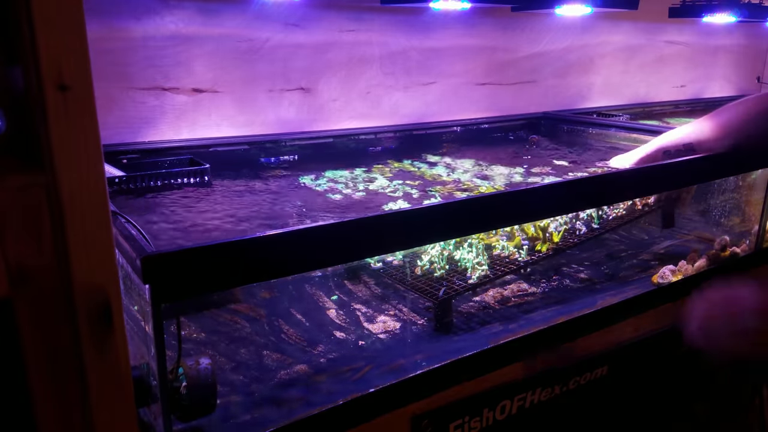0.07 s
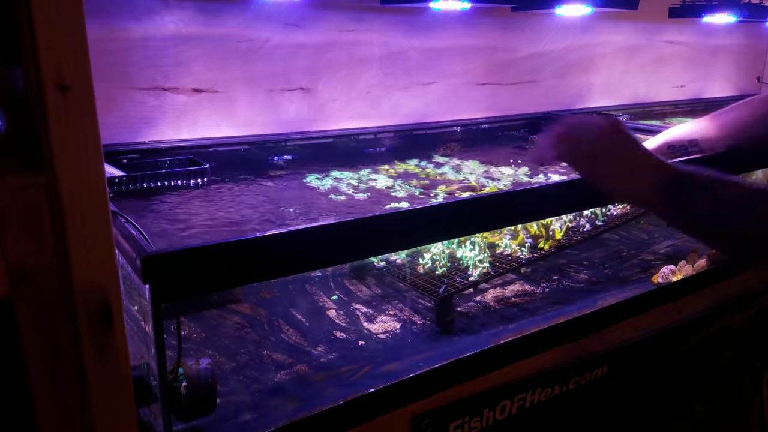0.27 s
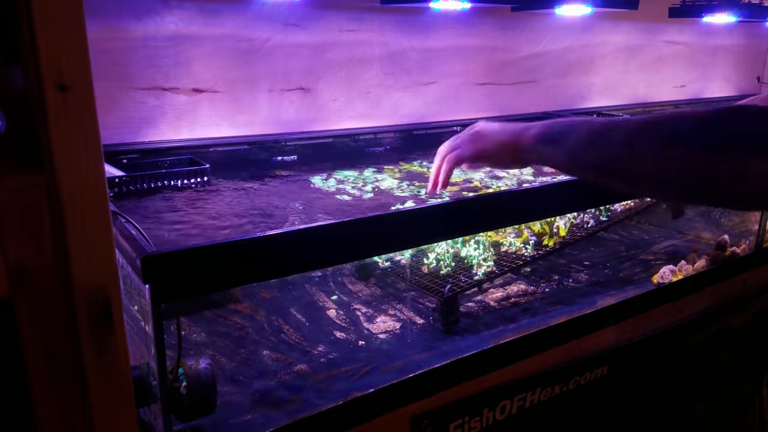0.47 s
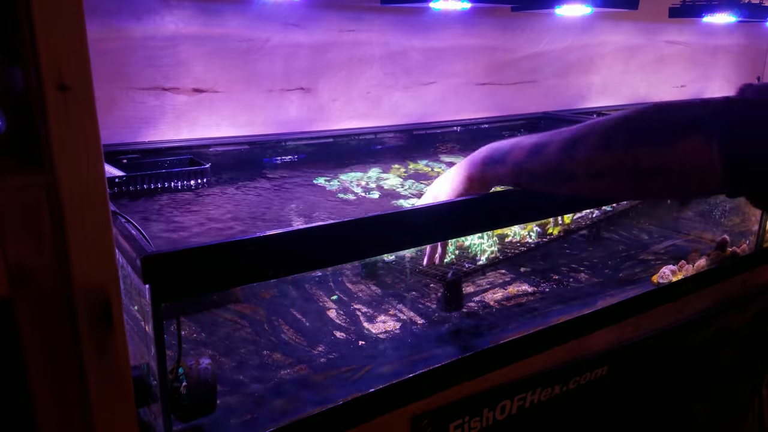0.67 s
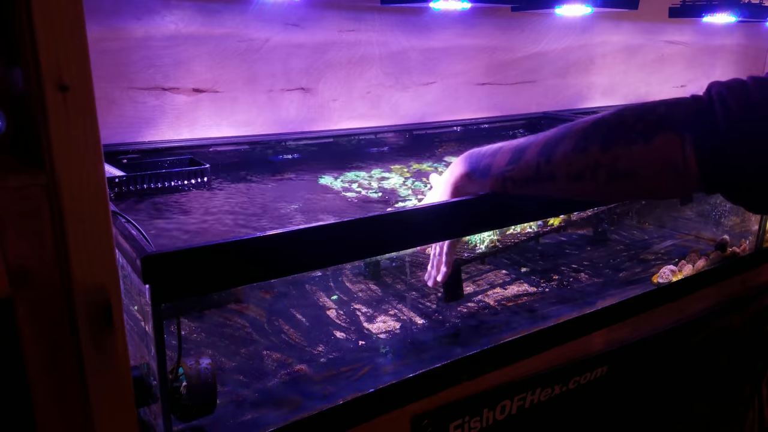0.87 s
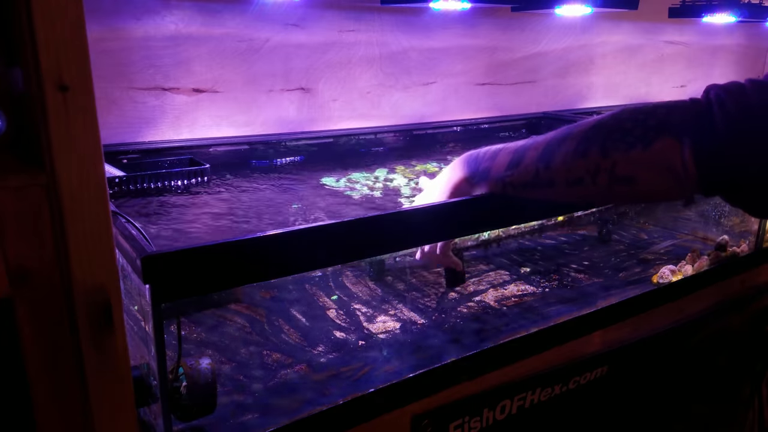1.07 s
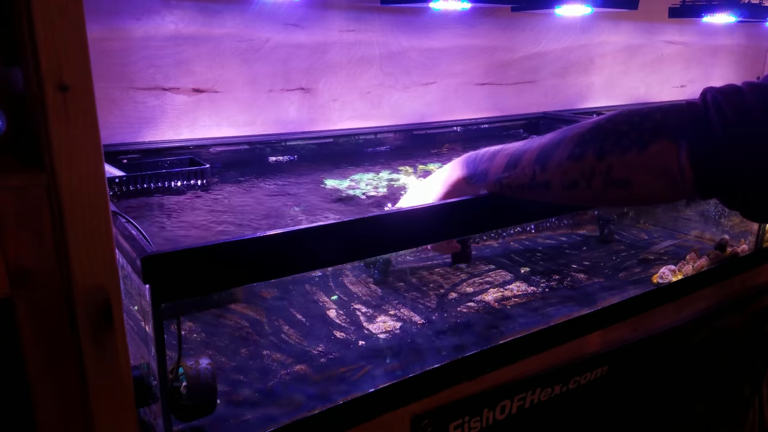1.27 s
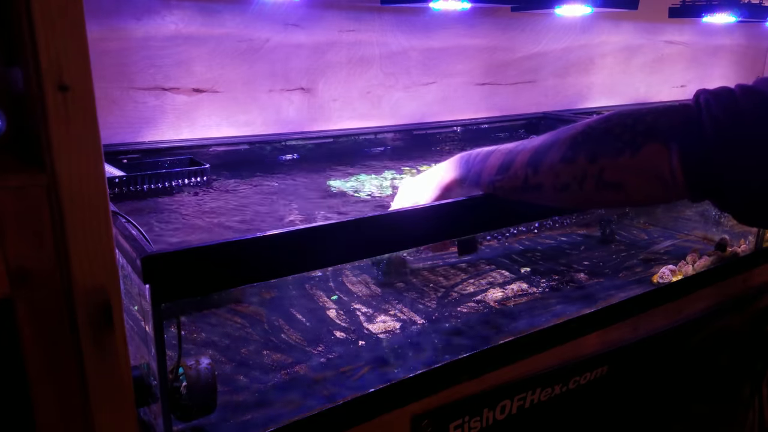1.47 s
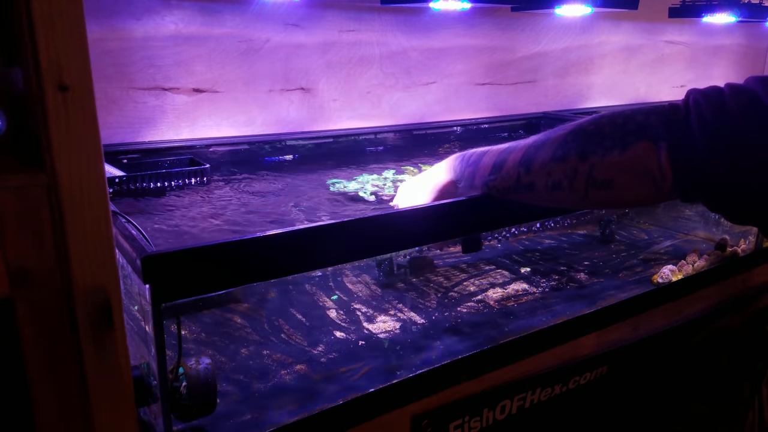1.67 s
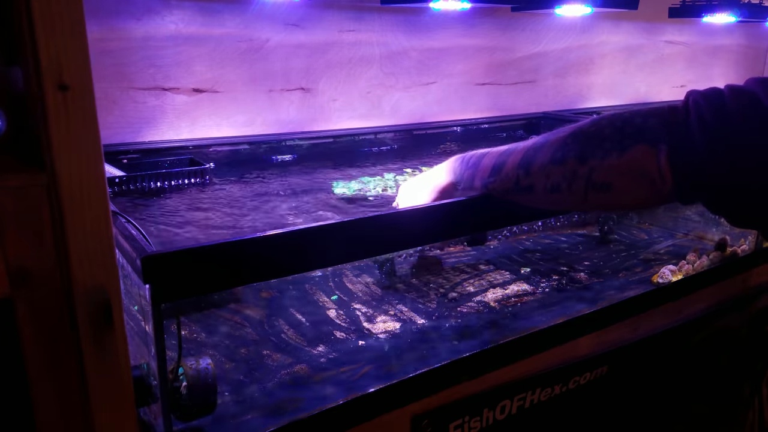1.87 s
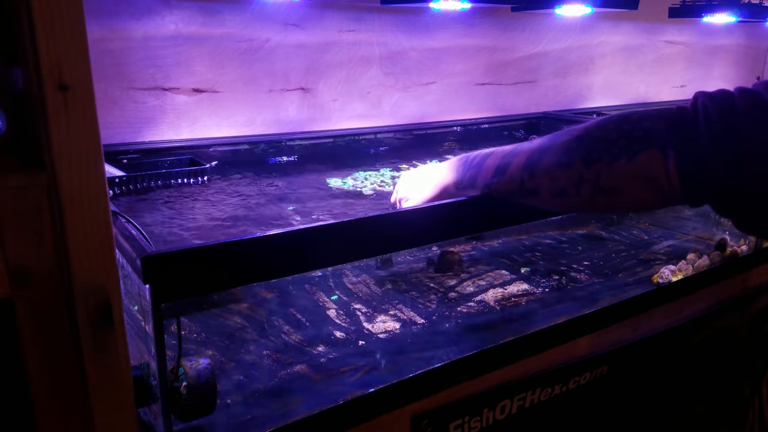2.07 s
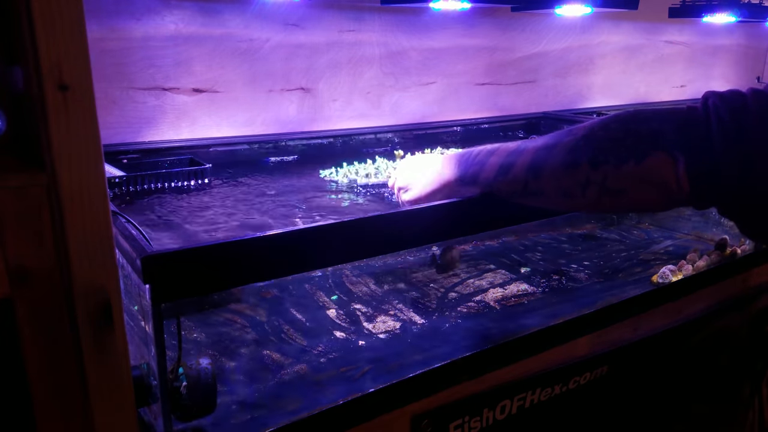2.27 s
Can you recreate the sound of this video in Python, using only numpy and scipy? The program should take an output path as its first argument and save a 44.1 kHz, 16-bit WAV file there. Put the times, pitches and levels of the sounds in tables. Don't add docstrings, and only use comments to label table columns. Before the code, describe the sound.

A steady electric hum from fish tank pumps with a slow beat and a thin whine on the right; water trickles softly, with small bubbly plips and light rustles as an arm reaches in, indoors, heard close.

```python
import sys
import numpy as np
from scipy import signal
from scipy.fft import rfft, irfft
from scipy.io import wavfile
from scipy.ndimage import uniform_filter1d

SR = 44100
rng = np.random.default_rng(int(sys.argv[2]) if len(sys.argv) > 2 else 0)


def gain_from_db(level_db):
    decades = np.asarray(level_db, float) / 20
    return 10 ** decades


def master(y):
    cut = np.clip(np.atleast_2d(y).T, -1, 1)
    pcm = np.round(cut * 32767)
    wavfile.write(sys.argv[1], SR, pcm.astype(np.int16))


N = 102841
T = np.arange(N) / SR
HZ = np.maximum(np.arange(N // 2 + 1) * SR / N, 1)

# multiple of the mains frequency, level/dB
HUM_PARTIALS = [
    (1, -53.5),
    (2, -49),
    (4, -55),
    (5, -53.5),
    (8, -62),
]
WHINE_PITCHES = [
    2929.9,
    2841,
    3854.4,
]
# level/dB, left over right/dB
WHINE_LEVELS = [
    (-67, -9.5),
    (-80, -3),
    (-81.5, -9),
]
# t/s, level/dB
WHINE_PAST_ARM = [(0, -1.5), (.55, 1.5), (.75, 5.5), (.9, 4.5), (1.1, 3), (1.6, 0), (1.8, -1.5), (2.33, -6)]
# f/Hz, width/Hz, level/dB
RESONANCES = [(107, 7, -57), (138, 16, -57), (168, 18, -57), (192, 30, -55), (271, 16, -48.5),
              (318, 26, -58), (430, 22, -54), (565, 14, -61), (647, 10, -65), (700, 40, -60),
              (772, 30, -59), (971, 18, -60), (1121, 45, -60), (1200, 50, -62), (1290, 20, -65)]
# t/s, level/dB
PUMP_LOAD = [(0, 2), (.25, -10), (.37, 2), (.55, -9), (.66, 7.5), (.83, -7.5), (.94, 5), (1.06, -8),
             (1.32, 1), (1.43, -9), (1.5, 10.5), (1.72, 8.5), (1.82, 2), (1.94, 5), (2.04, -1.5), (2.14, 6),
             (2.33, 0)]
# f/Hz, level/dB
STAND_PANELS = [
    (110, -50),
    (273.5, -56),
]
# t/s, level/dB
ARM_LEAN = [(0, -14), (.8, -3), (1.1, -15), (1.4, -14), (1.5, 4), (1.62, -22), (1.8, 2), (2.04, -4),
            (2.14, -9), (2.26, 9), (2.33, -12)]
# f/Hz, density/dB per Hz
RUMBLE_SPECTRUM = [(20, -78), (48, -78.5), (78, -73), (100, -70), (152, -70), (310, -67), (345, -68.5),
                   (480, -69.5)]
# f/Hz, density/dB per Hz
FLOW_SPECTRUM = [(500, -73), (880, -77), (1250, -77.5), (1450, -82), (2900, -87.5), (3400, -91.5),
                 (5500, -100.5), (16000, -104.5)]
# f/Hz, likeness/0-1
STEREO_LIKENESS = [(30, 0.98), (130, 0.95), (290, 0.87), (640, 0.5), (1100, 0.04), (1500, 0.), (16000, 0.1)]
# t/s, f/Hz, level/dB, left over right/dB
HAND_PLIPS = [(.045, 1180, -45, 4), (.158, 1070, -48, 0), (.166, 2500, -41, 1), (.168, 1060, -35, 0),
              (.169, 1220, -36, 0), (.171, 1900, -45, 2), (.18, 1090, -43, 0), (.171, 2700, -43, 0),
              (.195, 1900, -47, 0), (.238, 970, -42, 0), (.252, 980, -42, 0), (.36, 2700, -51, 0),
              (.52, 4000, -55, 2), (.535, 700, -40, 0), (.85, 430, -38, 0), (1.225, 1150, -44, 5),
              (1.455, 1750, -45, 3), (1.463, 2100, -45, 1), (1.548, 2080, -49, -3), (1.605, 2950, -46, -6),
              (1.77, 3050, -48, -2), (1.783, 2290, -39, 2), (1.795, 2450, -39, -1), (1.808, 2520, -49, 0),
              (1.828, 2350, -44, -1), (1.827, 1900, -46, 0), (1.852, 3200, -48, 0), (1.904, 2720, -46, 0),
              (1.94, 2050, -47, 0), (1.96, 2830, -48, 0), (2.012, 2100, -45, 0), (2.017, 2740, -44, 0),
              (2.225, 1900, -47, -2), (2.24, 2200, -48, -2), (2.308, 760, -39, 0), (2.31, 435, -35, 0)]
# t/s, length/s, centre f/Hz, width/octaves, level/dB
SLEEVE_RUSTLES = [(0.098, 0.099, 13700, 0.77, -60.5), (0.093, 0.14, 3950, 2.3, -57.5),
                  (0.165, 0.038, 1970, 2.4, -48), (0.176, 0.013, 14000, 0.43, -54),
                  (0.356, .05, 2570, 0.82, -56), (0.517, 0.023, 4470, 1.1, -57),
                  (.91, 0.037, 14500, .3, -61), (1.214, 0.053, 6900, 2, -60.5),
                  (1.44, 0.079, 2200, 2.1, -55.5), (1.518, 0.21, 4450, 1.5, -64),
                  (1.546, 0.19, 12000, 1.7, -63.5), (1.747, 0.084, 3000, 4.8, -61.5),
                  (1.848, 0.09, 2570, 1.4, -61), (2.01, 0.028, 2400, 1.4, -58),
                  (2.037, 0.15, 4960, 1.9, -64), (2.027, 0.08, 11500, 1.5, -62.5),
                  (2.212, 0.063, 2000, 1.3, -52.5)]
# f/Hz, level/dB
LEFT_COLOUR = [(60, 0), (700, 0.6), (2600, -1), (5000, 1), (7700, 4), (9000, -2.5), (13000, 7), (15700, -7)]
# f/Hz, level/dB
RIGHT_COLOUR = [(60, 2.5), (2600, 3), (5800, 2), (7300, -10), (9300, -16), (10600, -1), (13000, 1.5),
                (15700, 3.5)]
# t/s, level/dB
GAIN_RIDE = [(0, -1.5), (.7, -1), (1.2, 0), (1.5, 1), (2.33, 1)]


def over_hz(table):
    hz, value = np.array(table).T
    return np.interp(np.log(HZ), np.log(hz), value)


def over_time(table):
    return np.interp(T, *np.array(table).T)


def walk(rate):
    hold = int(SR / rate)
    held = rng.standard_normal(200)[np.minimum(np.arange(N) // hold, 199)]
    return 1.3 * uniform_filter1d(uniform_filter1d(held, hold), hold)


def stereo_noise():
    like = np.clip(over_hz(STEREO_LIKENESS), 0, 1)
    mid, side = rfft(rng.standard_normal((2, N))) * np.sqrt(SR / 4)
    return np.sqrt(1 + like) * mid + np.sqrt(1 - like) * side * np.array([[1], [-1]])


def pan(db):
    return gain_from_db(np.array([[db / 2], [-db / 2]]))


def add(out, start_s, sound):
    i = int(start_s * SR)
    out[:, i:i + sound.shape[1]] += sound[:, :N - i]


def tone(hz, at=0):
    return np.sqrt(2) * np.cos(2 * np.pi * hz * (T - at))


def waver():
    waver_db, changes_per_s = .7, 9
    return gain_from_db(waver_db * walk(changes_per_s))


def impellers():
    low_hz, beat_hz, loudest_s = 94.4, 2.3, .31
    second = gain_from_db(-4) * tone(low_hz + beat_hz, loudest_s)
    return gain_from_db(-49.5) * waver() * (tone(low_hz, loudest_s) + second)


def mains_hum():
    mains_hz = 60
    return sum(gain_from_db(db) * waver() * tone(k * mains_hz, rng.random()) for k, db in HUM_PARTIALS)


def whines():
    out = 0
    for hz, (db, side_db) in zip(WHINE_PITCHES, WHINE_LEVELS):
        out = out + gain_from_db(db) * pan(side_db) * waver() * tone(hz, rng.random())
    return out * gain_from_db(over_time(WHINE_PAST_ARM))


def cabinet():
    cabinet_hz, buzz_width_hz = 211.6, 28
    noise = stereo_noise()
    rings = 0
    for hz, width, db in RESONANCES:
        rings = rings + gain_from_db(db) / np.sqrt(width) / (1 + ((HZ - hz) * 2 / width) ** 2)
    buzz = irfft(noise * np.exp(-((HZ - cabinet_hz) / buzz_width_hz) ** 2), N)
    drone = np.sqrt(2) * np.sin(2 * np.pi * cabinet_hz * T) + gain_from_db(-9) * buzz / buzz.std()
    return irfft(noise * rings, N) + gain_from_db(-53 + over_time(PUMP_LOAD)) * drone


def panels():
    lean_db = over_time(ARM_LEAN)
    return np.sqrt(2) * sum(gain_from_db(db + lean_db) * np.sin(2 * np.pi * hz * T) for hz, db in STAND_PANELS)


def bubble(hz, cycles, glide, rise=2):
    turns = np.arange(int(cycles * SR / hz)) * hz / SR
    ring = np.sin(2 * np.pi * turns * (1 + glide * turns / cycles / 2))
    return ring * np.minimum(turns / rise, 1) * gain_from_db(-40 * turns / cycles)


def flow_bubbles():
    bubbles_per_s, low_hz, octaves = 90, 710, 2.4
    level_db, spread_db = -62, 3
    out = np.zeros((2, N))
    for when, pitch, size, side in rng.random((int(bubbles_per_s * N / SR), 4)):
        db = level_db - spread_db * np.log(1 - size) - 12 * pitch
        ring = bubble(low_hz * 2 ** (octaves * pitch), cycles=32, glide=.09)
        add(out, when * N / SR, gain_from_db(db) * pan(12 * (side - .5)) * ring)
    return out


def plips():
    out = np.zeros((2, N))
    for when, hz, db, side_db in HAND_PLIPS:
        add(out, when, gain_from_db(db) * pan(side_db) * bubble(hz, cycles=34, glide=.07, rise=2.2))
    return out


def rustles():
    attack_s = .008
    out = np.zeros((2, N))
    for when, length, hz, octaves, db in SLEEVE_RUSTLES:
        hiss = irfft(stereo_noise() * np.exp(-(2 * np.log2(HZ / hz) / octaves) ** 2), N)
        attack = np.clip((T - when) / attack_s, 0, 1)
        release = np.clip((when + length - T) * 2 / length, 0, 1)
        out += gain_from_db(db) * attack * release * hiss / hiss.std()
    return out


def room(wet):
    t60_s, level_db = .3, -7
    tail = rng.standard_normal((2, SR // 2)) * gain_from_db(-60 * T[:SR // 2] / t60_s)
    tail /= np.sqrt((tail ** 2).sum(axis=1, keepdims=True))
    return gain_from_db(level_db) * signal.fftconvolve(wet, tail, axes=1)[:, :N]


def wash():
    swell_db, neighbour_db, flicker_db, treble_flicker_db = .1, .25, .25, .9
    noise = stereo_noise() * gain_from_db(over_hz(RUMBLE_SPECTRUM + FLOW_SPECTRUM))
    swell, near = walk(.36), walk(8.2)
    place = 2 * np.log2(HZ / 20)
    out = 0
    for k in range(21):
        share = np.cos(np.pi / 2 * np.clip(place - k, -1, 1)) ** 2
        near = .8 * near + .6 * walk(5)
        own_db = flicker_db + treble_flicker_db * (k / 20) ** 2
        level_db = swell_db * swell + neighbour_db * near + own_db * walk(16)
        out = out + gain_from_db(level_db) * irfft(noise * share, N)
    return out


def scene():
    pumps = impellers() + mains_hum() + whines()
    wet = flow_bubbles() + plips() + rustles()
    return pumps + cabinet() + panels() + wet + room(wet) + wash()


def top_cut(x):
    return signal.sosfilt(signal.butter(12, 15830, fs=SR, output="sos"), x)


def record(dry):
    top_hz, offset = 15660, -.00067
    ports = gain_from_db(np.array([over_hz(LEFT_COLOUR), over_hz(RIGHT_COLOUR)])) * (HZ < top_hz)
    mix = irfft(rfft(dry) * ports, N) * gain_from_db(over_time(GAIN_RIDE)) + offset
    return top_cut(mix)


dry = scene()
out = record(dry)
master(out)
```